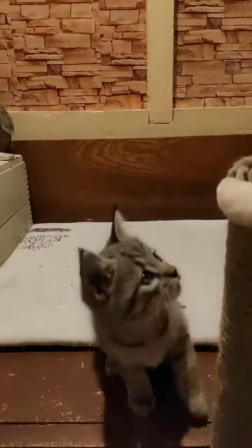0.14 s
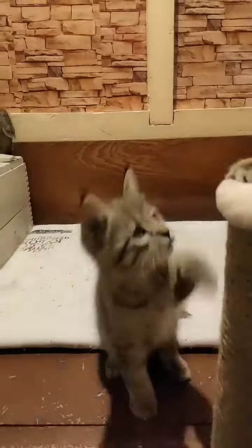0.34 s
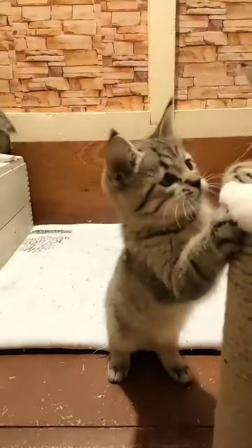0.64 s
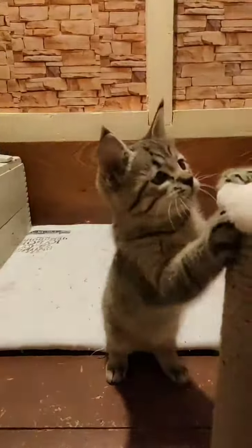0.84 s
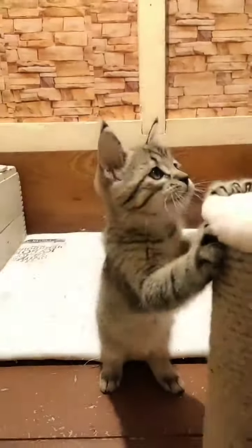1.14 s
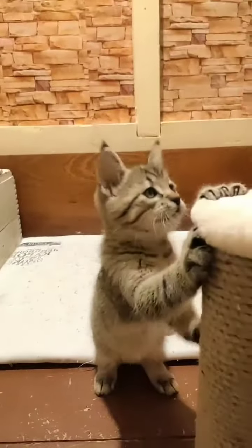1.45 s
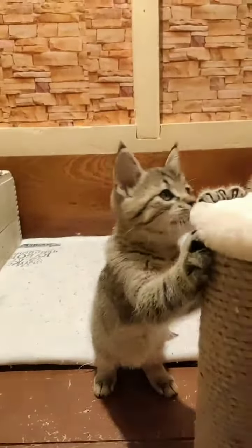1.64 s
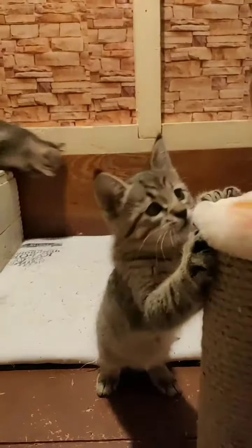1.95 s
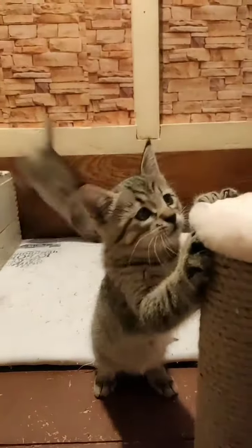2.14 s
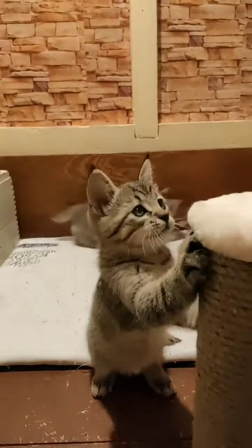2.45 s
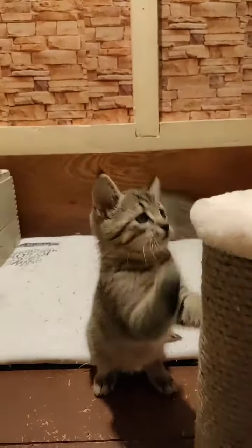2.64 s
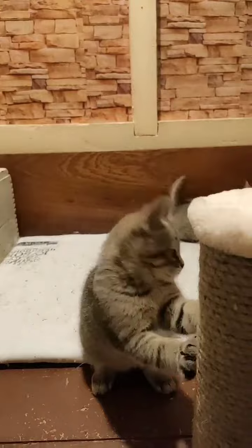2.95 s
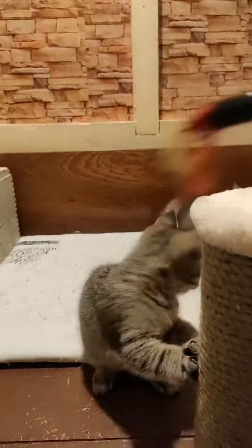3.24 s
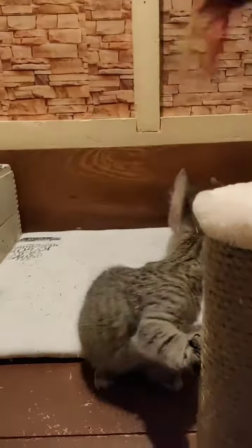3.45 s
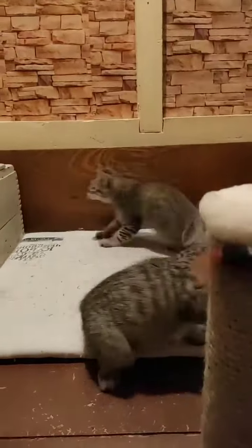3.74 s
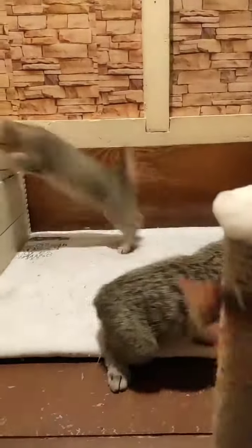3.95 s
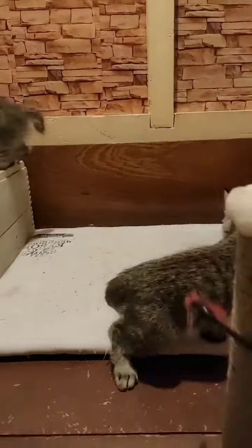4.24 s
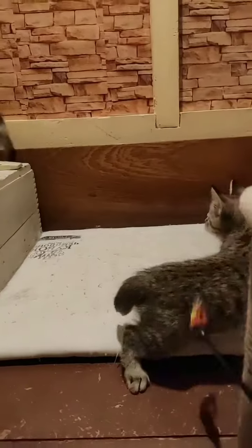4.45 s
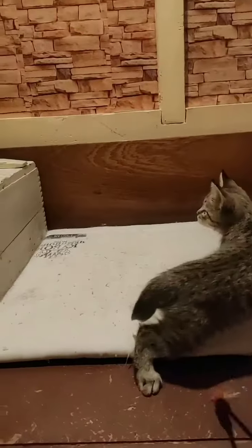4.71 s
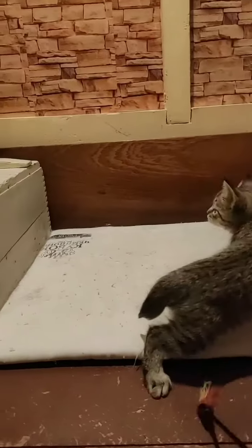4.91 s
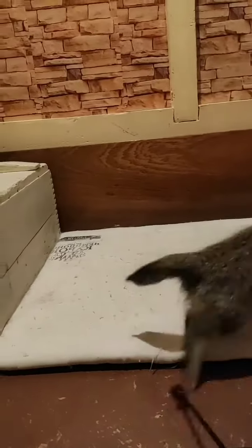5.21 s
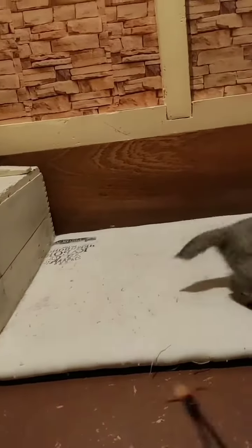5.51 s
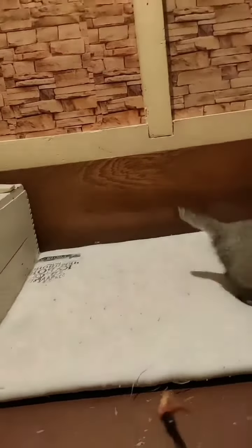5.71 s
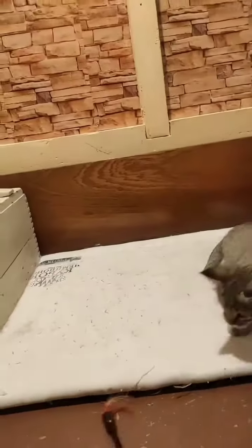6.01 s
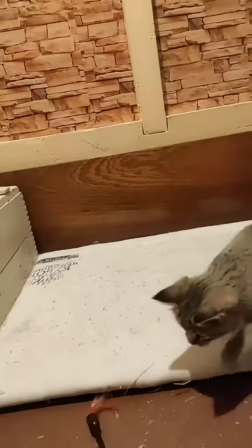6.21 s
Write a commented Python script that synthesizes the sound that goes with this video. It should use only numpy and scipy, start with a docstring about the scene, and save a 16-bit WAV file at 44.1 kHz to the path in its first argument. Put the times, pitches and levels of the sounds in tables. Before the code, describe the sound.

Quiet, hissy indoor play, with a light wooden rap, padded kitten steps and rope scratches growing busier before a wand clacks sharply twice on the floor.

```python
"""Quiet hiss and low rumble, then soft scuffs and paw steps: kittens play in a small room.
Paws thump the boards (damped low modes), knock hollow wood (mode banks) and scuff mat and rope
(snags over fluttering noise); claws tick (short clicks with damped rings).
Something light raps a wooden edge, a wand's tuft swipes the post, and a kitten skids along the mat.
Later the wand clacks twice on the floor, far louder than the claws."""
import sys
import numpy as np
from scipy import signal
from scipy.fft import rfft, irfft, next_fast_len
from scipy.io import wavfile
from scipy.ndimage import map_coordinates

SR = 44100
rng = np.random.default_rng(int(sys.argv[2]) if len(sys.argv) > 2 else 0)


def unload_audio(sound):
    """Save the sound as a 16-bit wav file, at the path given as the first command line argument."""
    columns = np.transpose(np.atleast_2d(sound))
    # keep every value between -1 and 1, then stretch to whole-number steps
    steps = np.round(np.clip(columns, -1, 1) * 32767)
    wavfile.write(sys.argv[1], SR, steps.astype(np.int16))


N = 280917

# Events; levels are relative within each table
# Handling rumble: t/s, level/dB
RUMBLE_LEVELS = [(0.0, -72.5), (2.84, -59.5), (3.09, -70.5), (3.99, -51.5), (4.26, -58.5), (4.67, -56.5),
                 (5.14, -70), (5.29, -66), (6.37, -68)]
# Paw or flank slides on mat and rope: start/s, length/s, rub level/dB, scratch level/dB
SCUFFS = [(.125, .06, -66, -74), (.25, 0.033, -65.5, -71.5), (.335, 0.079, -68.5, -64.5),
          (.56, .08, -68, -70), (.865, .045, -72, -67.5), (.99, 0.082, -63.5, -66),
          (1.29, 0.032, -64, -70.5), (1.44, 0.029, -58.5, -70), (1.56, 0.048, -57, -67),
          (1.93, 0.057, -59.5, -61), (2.395, 0.059, -62, -62.5), (2.48, 0.11, -68, -68.5),
          (2.617, 0.13, -65.5, -58.5), (2.84, 0.014, -62, -68), (2.98, 0.2, -65.5, -68.5),
          (3.143, 0.022, -60, -78), (3.215, 0.05, -56.5, -65), (3.33, 0.091, -76, -82),
          (3.444, 0.039, -59.5, -61), (3.55, 0.049, -61, -63), (3.722, 0.014, -56.5, -60),
          (3.77, 0.051, -72, -66.5), (3.915, .11, -49, -62), (4.03, 0.25, -56.5, -58.5),
          (4.29, 0.081, -59.5, -62.5), (4.372, 0.085, -57, -59), (4.51, 0.066, -56.5, -55.5),
          (4.612, 0.049, -51, -59), (4.96, 0.11, -50, -67), (5.2, 0.019, -54, -82),
          (5.4, 0.068, -46.5, -64), (5.475, 0.062, -55, -67), (5.585, 0.067, -43, -62),
          (5.69, 0.1, -48.5, -64), (5.81, 0.052, -44.5, -60.5), (5.975, 0.047, -53.5, -64.5),
          (6.15, 0.05, -53.5, -67)]
# Firm paw steps: t/s, level/dB
STEPS = [(0.137, -63), (0.259, -53), (1.002, -48), (1.204, -55), (1.576, -47), (2.26, -49), (2.709, -38),
         (3.105, -40), (3.207, -44.5), (3.445, -41.5), (3.548, -47.5), (3.724, -44), (3.844, -35.5),
         (3.97, -40), (4.209, -46.5), (4.374, -38), (4.514, -30.5), (4.539, -34.5)]
# Soft landings on the floor: t/s, level/dB, board mode f/Hz
THUMPS = [(0.382, -46, 83), (0.978, -47, 80), (1.208, -39.5, 76), (1.59, -47, 167), (1.771, -52, 98),
          (1.991, -47, 74), (2.261, -44, 78.6), (2.474, -50, 54.4), (2.7, -41.5, 89), (3.202, -34.5, 89),
          (3.539, -44, 85), (3.735, -41, 97.6), (3.837, -37, 100.7), (3.941, -37, 88.5), (4.184, -37, 90.3),
          (4.434, -46.5, 131), (4.559, -36.5, 75.7), (4.667, -47, 69.6), (5.409, -40, 77), (5.624, -47, 93),
          (5.742, -40, 77), (6.172, -46, 75)]
# Light raps on a wooden edge: t/s, level/dB
RAPS = [(.3855, -38.5), (.3882, -22.5)]
# Hard contacts of wand and claws: t/s, level/dB, ring f/Hz, lingering part level/dB
CLACKS = [(1.044, -36, 2780, -19), (2.520, -39.5, 3020, 3.5), (2.585, -33.5, 2060, 4),
          (2.617, -30.5, 2830, -7), (2.712, -32, 2770, 9.5), (2.866, -36.5, 2300, 14),
          (3.144, -31.5, 2400, 7), (3.449, -32, 2270, 7.5), (3.727, -33, 2660, 6), (3.913, -30, 3320, 9),
          (4.287, -33.5, 1200, 11.5), (4.31, -29, 2470, 3), (4.376, -31, 2630, 9),
          (4.5091, -24.5, 2690, -2), (4.626, -25.5, 2430, 9), (4.682, 2.5, 2630, 3), (4.8408, -1, 2540, 4),
          (4.956, -28.5, 2250, 8.5), (5.120, -41.5, 1970, 11), (5.205, -39.5, 1070, 16.5),
          (5.285, -39.5, 2980, -2), (5.405, -24.5, 1880, 10), (5.523, -27.5, 2460, 7),
          (5.552, -28, 2320, 8.5), (5.598, -25.5, 2110, 14.5), (5.813, -35.5, 1860, 16),
          (6.191, -30.5, 2340, 8.5)]
# Blows on hollow wood: t/s, level/dB
KNOCKS = [(1.772, -59.5), (1.998, -36.5), (2.067, -43.5), (2.155, -30), (2.198, -46), (2.502, -55),
          (4.402, -42), (4.435, -43.5)]
# Wand's tuft meets the post: start/s, length/s, level/dB
SWIPES = [(1.985, 0.13, -54.5), (2.058, 0.031, -39.5), (2.14, 0.026, -51.5)]
# Kitten skids along the mat: start/s, length/s, level/dB
SKIDS = [(3.95, 0.033, -53.5), (4.045, .09, -61)]

# Nominal modes of the floor boards: f/Hz, relative level/dB, t60/s
BOARD_MODES = [(160.5, -0.5, 0.075), (280.3, 2.5, 0.14), (348, 6.5, 0.051), (448, -4.5, 0.086),
               (588, -4, 0.13), (733, -2, .035)]
# Nominal modes of the wooden edge: f/Hz, relative level/dB, t60/s
EDGE_MODES = [(510, -19, 0.18), (548, -6, 0.11), (872, -2.5, 0.085), (1010, 11.5, 0.012),
              (1267, 12.5, 0.016), (1600, -7, 0.041), (1965, 10, 0.013), (2170, -5.5, 0.05)]
# Nominal modes of the wand's stick: f/Hz, relative level/dB, t60/s
STICK_MODES = [(961, 17, 0.18), (1340, -10.5, 0.12), (1810, -25, .12), (2160, -14, 0.051),
               (2606, 14.5, 0.16), (3040, -9, 0.12), (3140, -25, 0.066)]
# Nominal modes of the hollow wood: f/Hz, relative level/dB, t60/s
HOLLOW_MODES = [(266.8, -3.5, .2), (396, -11, 0.17), (541.6, 6, 0.13), (606, -5, 0.1), (755, -4.5, 0.07),
                (904, -9.5, 0.086), (1490, -16, 0.075), (1650, -12, 0.07)]

# Background hiss spectrum: f/Hz, relative level/dB
HISS_SPECTRUM = [(12, -50), (20, -7.5), (70, -5), (101, -8.5), (219, -15.5), (274, -24.5), (452, -23.5),
                 (581, -28.5), (1500, -33.5), (2610, -32), (6910, -39), (14300, -39.5), (15500, -36.5)]
# Dull rub on the mat, spectrum: f/Hz, relative level/dB
RUB_SPECTRUM = [(120, -10.5), (225, -14.5), (280, 3.5), (420, -6.5), (650, -1), (980, -4.5), (1400, -9.5),
                (2000, -31), (2800, -29), (3800, -56), (8000, -44)]
# Claws and rope fibres, spectrum: f/Hz, relative level/dB
SCRATCH_SPECTRUM = [(500, -17), (1300, -6.5), (2100, -0.5), (2700, -1.5), (3600, -6.5), (5500, -12.5),
                    (9000, -18), (15000, -19)]
# Snap of a caught rope strand, spectrum: f/Hz, relative level/dB
CATCH_SPECTRUM = [(400, -10), (1200, -2.5), (2500, 2), (4000, -9), (12000, -24.5)]
# Click of a hard contact with a 2650 Hz ring, spectrum: f/Hz, relative level/dB
CLICK_SPECTRUM = [(60, -17), (200, -12), (400, -4), (650, 1.5), (950, -0.5), (1500, -2), (2000, -3.5),
                  (2800, -7.5), (3450, -11.5), (4300, -21.5), (6500, -33), (15000, -38)]
# Tuft on the post, spectrum: f/Hz, relative level/dB
SWISH_SPECTRUM = [(180, -44), (300, -8), (404, -16), (590, -2), (863, -6), (1350, -8.5), (1620, 1),
                  (1750, -12), (2740, -9), (3400, -17.5), (3870, -14.5), (13100, -29.5), (15500, -36)]

# Room decay: f/Hz, t60/s
ROOM_DECAY = [(100, 0.72), (280, 0.42), (600, 0.22), (1400, 0.28), (3700, 0.18), (10000, 0.23)]
# Diffuse field: f/Hz, left-right correlation
CORRELATION = [(100, 0.9), (300, 0.91), (640, 0.7), (1200, 0.09), (3000, 0.25), (12000, 0.037)]
# Stereo lean of the play: f/Hz, left minus right level/dB
LEAN = [(100, 3), (300, 0), (700, 1), (1300, 1), (2400, 7), (3300, 5), (4500, 2), (8000, -3), (15000, 0.5)]

T = np.arange(SR // 3) / SR  # time within one blow or stroke, s
TIME_S = np.arange(N) / SR
TOP_HZ = 15750

# Strokes
GRIP_S, EASE_DB_PER_S, RELEASE_DB_PER_S = 0.011, 24, 217
ARCH_DB_PER_S = 20.5  # mid-stroke swell per second of stroke length
# Faint shuffling between strokes
FIDGET_RUB_DB, FIDGET_SCRATCH_DB, FIDGET_SWING_DB, FIDGET_GROWTH_S = -73, -75, 1.5, 2.9
CATCHES_PER_S, CATCH_DB = 45, -6.5
SKID_FROM_HZ, SKID_TO_HZ, SKID_RISE_S = 1100, 1545, 0.13


def amp(db):
    """Decibels to gain."""
    return 10 ** (np.asarray(db) / 20)


def unit(x):
    """Scale to rms 1."""
    return x / np.sqrt(np.mean(x ** 2) + 1e-20)


def along(points, hz):
    """Interpolate (f/Hz, value) points on a log frequency axis."""
    f, v = np.transpose(points)
    return np.interp(np.log(hz + 1), np.log(f + 1), v)


def wobble(knots_per_s):
    """Smooth random curve through normally distributed knots."""
    steps = np.linspace(0, N * knots_per_s / SR, N // 20)
    knots = rng.standard_normal(int(N * knots_per_s / SR) + 4)
    curve = map_coordinates(knots, [steps])
    return np.interp(np.arange(N) * knots_per_s / SR, steps, curve)


def filtered(x, response):
    """Apply a gain given as a function of frequency."""
    n = x.shape[-1]
    m = next_fast_len(n + SR // 10)
    return irfft(rfft(x, m) * response(np.fft.rfftfreq(m, 1 / SR)), m)[..., :n]


def spread(pair, colour=lambda hz: 1):
    """Turn two unrelated signals into a diffuse stereo field, most alike in the bass."""
    def mid_side_gain(hz):
        alike = np.clip(along(CORRELATION, hz), -1, 1)
        return colour(hz) * np.sqrt([(1 + alike) / 2, (1 - alike) / 2])
    mid, side = filtered(pair, mid_side_gain)
    return np.array([mid + side, mid - side])


def coloured(pair, spectrum):
    """Diffuse stereo sound of rms 1 with the given spectrum."""
    return unit(spread(pair, lambda hz: amp(along(spectrum, hz))))


def add(track, s, sound):
    """Mix a sound into the track at time s."""
    part = track[:, max(round(s * SR), 0):][:, :len(T)]
    part += sound[..., :part.shape[1]]


def ring(hz, t60):
    """One mode: a sine with exponential decay."""
    return np.sin(2 * np.pi * hz * T) * amp(-60 * T / t60)


def pulse(spectrum, stretch):
    """Minimum-phase pulse of energy 1, its spectrum stretched in frequency."""
    n = len(T)
    gain = amp(along(spectrum, np.fft.rfftfreq(n, 1 / SR) / stretch))
    cepstrum = irfft(np.log(gain), n)
    # Fold the cepstrum to its causal half
    cepstrum[1:n // 2] *= 2
    cepstrum[n // 2 + 1:] = 0
    x = irfft(np.exp(rfft(cepstrum)), n)
    return x / np.linalg.norm(x)


def in_room(x, wet_db):
    """Room's diffuse answer to one blow: noise decaying at a rate set per frequency."""
    hz, t, z = signal.stft(rng.standard_normal((2, len(T))), SR, nperseg=256)
    decay = amp(-60 * t / along(ROOM_DECAY, hz)[:, None])
    tail = signal.istft(z * decay, SR, nperseg=256)[1][:, :len(T)]
    tail = spread(tail) * (1 - np.exp(-T / 0.0013))
    tail /= np.linalg.norm(tail[0])
    return amp(wet_db) * signal.fftconvolve(x[None], tail, axes=1)[:, :len(T)]


def early_walls(pair):
    """Floor, post and skirting return quick copies that comb the sound."""
    delay_s = rng.uniform(.002, .022, size=(2, 9))
    strength = rng.standard_normal(size=(2, 9))
    echoes = np.zeros((2, SR // 40))
    delay_samples = np.minimum(delay_s * SR, SR // 40 - 1).astype(int)
    np.put_along_axis(echoes, delay_samples, 0.36 * strength, axis=1)
    echoes[:, 0] = 1  # direct sound
    echoes /= np.linalg.norm(echoes, axis=1, keepdims=True)
    return signal.oaconvolve(pair, echoes, axes=1)[:, :N]


def strokes(rows, grip_s, release_db_per_s):
    """Gain curve per level column: each stroke grips, swells, eases off and releases."""
    power = np.zeros((len(rows[0]) - 2, N))
    for s, length_s, *levels_db in rows:
        grip = np.sin(np.pi / 2 * np.minimum(T / grip_s, 1))
        arch = np.sin(np.pi * np.minimum(T / length_s, 1)) - 2 / np.pi
        arch_db = ARCH_DB_PER_S * length_s * arch
        ease_db = EASE_DB_PER_S * np.minimum(T, length_s)
        release_db = release_db_per_s * np.maximum(T - length_s, 0)
        envelope = grip * amp(arch_db - ease_db - release_db)
        add(power, s, np.outer(amp(levels_db), envelope) ** 2)
    return np.sqrt(power)


def friction(spectrum, snags_per_s, grain_db, flutter_db):
    """Fibres catch and slip: uneven single snags over a fluttering rush."""
    snags = (rng.random(N) < snags_per_s / SR) * rng.standard_normal((2, N))
    rush = rng.standard_normal((2, N)) * amp(flutter_db * wobble(70))
    return coloured(early_walls(rush) + amp(grain_db) * unit(snags), spectrum)


def blows(events, modes, contact_s, pad_db, wet_db, level_db):
    """Struck wood: modes ring at slightly varied strength and pitch, with a puff from the contact."""
    out = np.zeros((2, N))
    for s, db in events:
        strength_db = rng.normal(0, 1.5, len(modes))
        detune = rng.normal(1, .005, len(modes))
        wood = sum(amp(level + d) * ring(hz * k, t60)
                   for (hz, level, t60), d, k in zip(modes, strength_db, detune))
        puff = unit(filtered(rng.standard_normal(len(T)), lambda hz: amp(along(RUB_SPECTRUM, hz))))
        puff *= amp(-60 * T / 0.088)
        blow = (wood + amp(pad_db) * puff) * (1 - np.exp(-T / contact_s))
        heard = blow + in_room(blow, wet_db)
        add(out, s, amp(db + level_db) * heard / np.abs(heard).max())
    return out


def background():
    """Steady room hiss, and low handling rumble that swells and sinks."""
    hiss = amp(-68.0) * coloured(rng.standard_normal((2, N)), HISS_SPECTRUM)
    rumble_spectrum = [(10, 2.0), (28, 1.5), (55, -14), (110, -11), (200, -21.0), (400, -47.5),
                       (1000, -73.0)]  # f/Hz, relative level/dB
    rumble = coloured(rng.standard_normal((2, N)), rumble_spectrum)
    rumble_db = np.interp(TIME_S, *np.transpose(RUMBLE_LEVELS))
    return hiss + amp(rumble_db + 5.0) * rumble


def scuffs():
    """Paws rub dully on the mat; claws and rope fibres scratch above, at times catching a strand."""
    rub, scratch = strokes(SCUFFS, GRIP_S, RELEASE_DB_PER_S)
    growth = np.minimum(TIME_S / FIDGET_GROWTH_S, 1)  # play warms up
    fidget = amp(FIDGET_SWING_DB * wobble(16)) * growth
    mat = friction(RUB_SPECTRUM, snags_per_s=300, grain_db=-5, flutter_db=2)
    rope = friction(SCRATCH_SPECTRUM, snags_per_s=300, grain_db=-5.5, flutter_db=1.6)
    catches = (rng.random(N) < CATCHES_PER_S / SR) * rng.uniform(.3, 1, (2, N))
    rope = rope + amp(CATCH_DB) * coloured(early_walls(catches), CATCH_SPECTRUM)
    rubbing = np.hypot(amp(-1) * rub, amp(FIDGET_RUB_DB) * fidget) * mat
    scratching = np.hypot(amp(-1.0) * scratch, amp(FIDGET_SCRATCH_DB) * fidget) * rope
    return rubbing + scratching


def steps():
    """Firm paw steps excite the modes of the floor boards."""
    return blows(STEPS, BOARD_MODES, contact_s=0.00082, pad_db=-10.5, wet_db=-6.0, level_db=-2.5)


def thumps():
    """A soft landing swells the floor's low mode over a few cycles, with a weaker overtone."""
    out = np.zeros((2, N))
    for s, db, hz in THUMPS:
        modes = ring(hz, t60=0.11) + amp(-11.5) * ring(2.1 * hz, t60=0.087)
        push = modes * (1 - np.exp(-(T / 0.023) ** 2))
        push /= np.abs(push).max()
        heard = push + in_room(push, wet_db=-11)
        add(out, s - .008, amp(db - 2.5) * heard)  # swell starts ahead of the table time
    return out


def raps():
    """Light raps ring the edge's short modes, slightly louder on the left."""
    wood = blows(RAPS, EDGE_MODES, contact_s=0.00044, pad_db=-12.0, wet_db=-7, level_db=-2.0)
    return wood * amp([[1], [-1]])  # left, right/dB


def clacks():
    """A hard contact clicks and rings the stick; the board hums and the walls answer."""
    out = np.zeros((2, N))
    lowpass = signal.butter(6, 3800, fs=SR, output="sos")
    for s, db, ring_hz, linger_db in CLACKS:
        click = pulse(CLICK_SPECTRUM, ring_hz / 2650)
        crack = signal.sosfilt(lowpass, click)
        # Short first ring, a few samples late, beams to the left
        beam = np.roll(ring(ring_hz, t60=0.011), SR // 7000) * amp([[2], [-8]])
        stick = sum(amp(level - 55 + rng.normal(0, 2.4, (2, 1))) * ring(hz * rng.normal(1, 0.0072), t60)
                    for hz, level, t60 in STICK_MODES)
        board = amp(-29.5) * ring(hz=274.4, t60=0.15)
        lingering = stick + board + in_room(click, wet_db=1.0)
        contact = amp(-2.5) * crack + amp(-12.0) * beam
        add(out, s, -amp(db - 6) * (contact + amp(linger_db) * lingering))
    return out


def knocks():
    """Blows on hollow wood excite its modes."""
    return blows(KNOCKS, HOLLOW_MODES, contact_s=0.00086, pad_db=-2, wet_db=-0.5, level_db=0.0)


def swipe():
    """The wand's tuft brushes the post: dense snags over a bright rush."""
    tuft = friction(SWISH_SPECTRUM, snags_per_s=900, grain_db=-4.5, flutter_db=2.2)
    return strokes(SWIPES, grip_s=0.014, release_db_per_s=239) * tuft


def skid():
    """A kitten slides: a narrow noise band rises in pitch and levels off."""
    since_s = np.maximum(TIME_S - SKIDS[0][0], 0)
    centre_hz = SKID_TO_HZ + (SKID_FROM_HZ - SKID_TO_HZ) * np.exp(-since_s / SKID_RISE_S)
    phase = 2 * np.pi * np.cumsum(centre_hz) / SR
    band = filtered(rng.standard_normal((2, N)), lambda hz: 1 / (1 + (hz / 210) ** 3))
    return strokes(SKIDS, GRIP_S, RELEASE_DB_PER_S) * unit(spread(band * np.cos(phase)))


def scene():
    """All the play, leaning left mostly in the upper middle range, over the background."""
    play = scuffs() + steps() + thumps() + raps() + clacks() + knocks() + swipe() + skid()
    leaning = filtered(play, lambda hz: amp(np.outer([.5, -.5], along(LEAN, hz))))
    return leaning + background()


def record(dry):
    """Band limit: steep roll-off above TOP_HZ."""
    return filtered(dry, lambda hz: amp(-60 * np.clip((hz - TOP_HZ) / 500, 0, 2)))


dry = scene()
out = record(dry)
unload_audio(out)
```